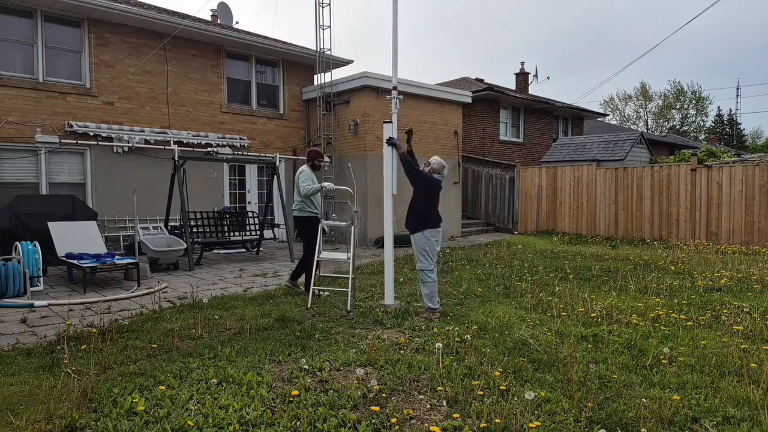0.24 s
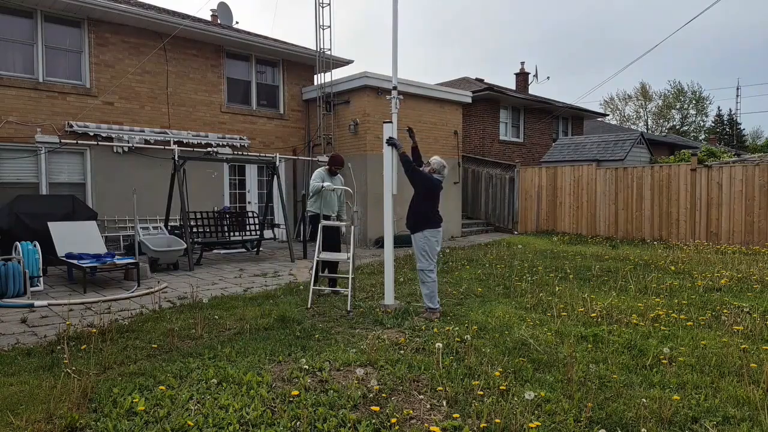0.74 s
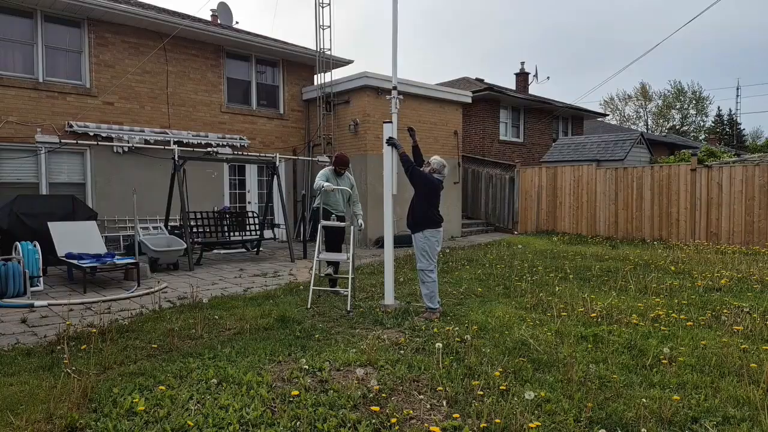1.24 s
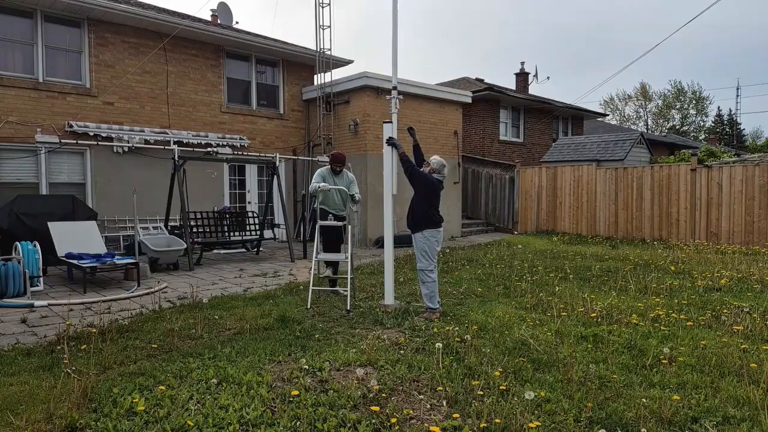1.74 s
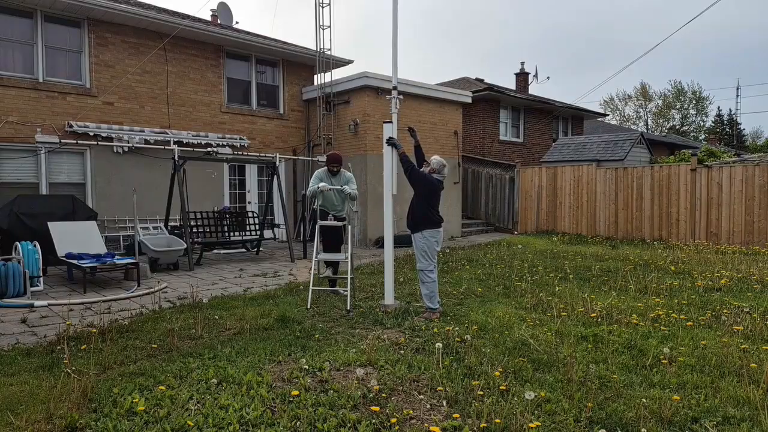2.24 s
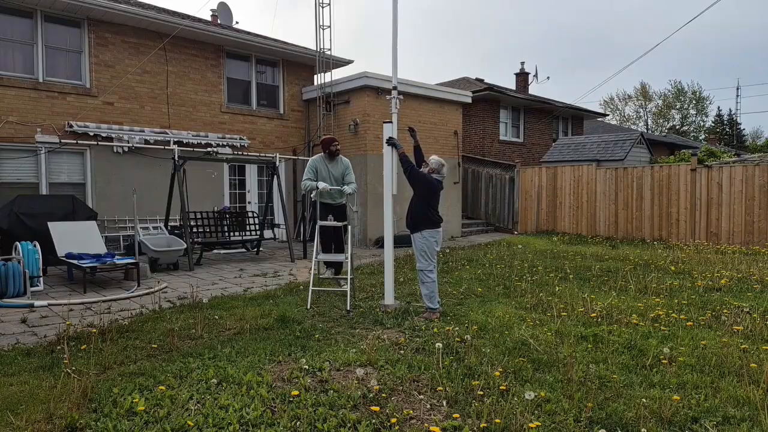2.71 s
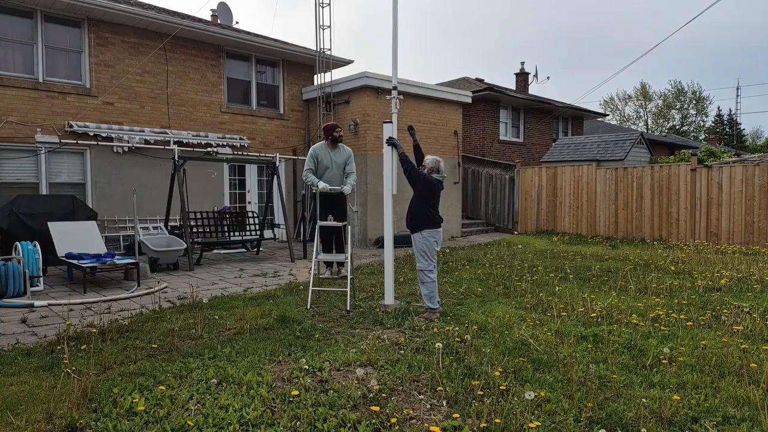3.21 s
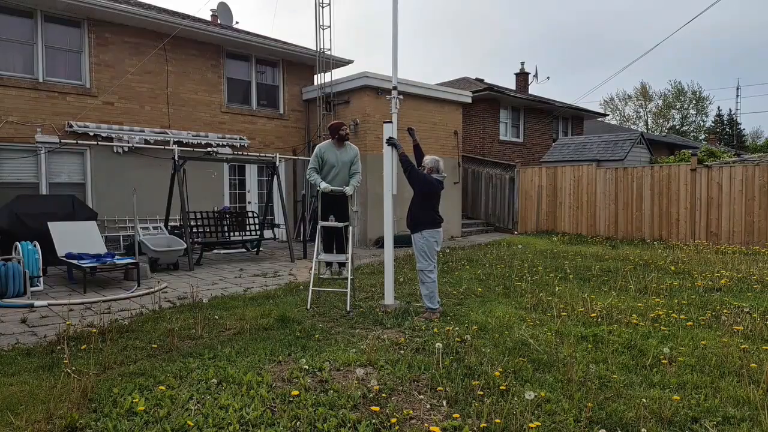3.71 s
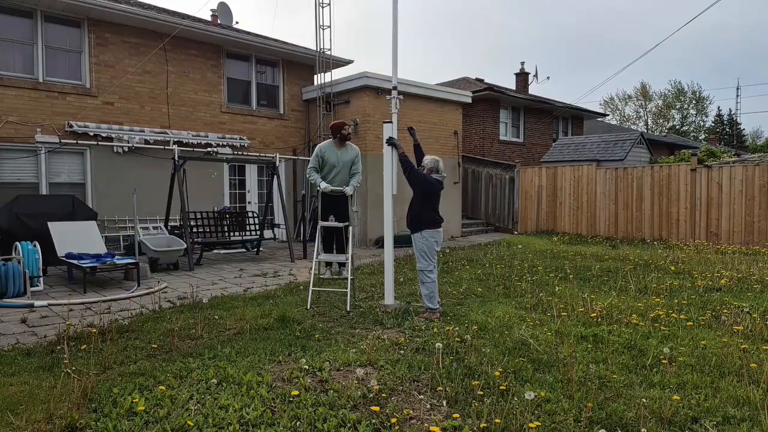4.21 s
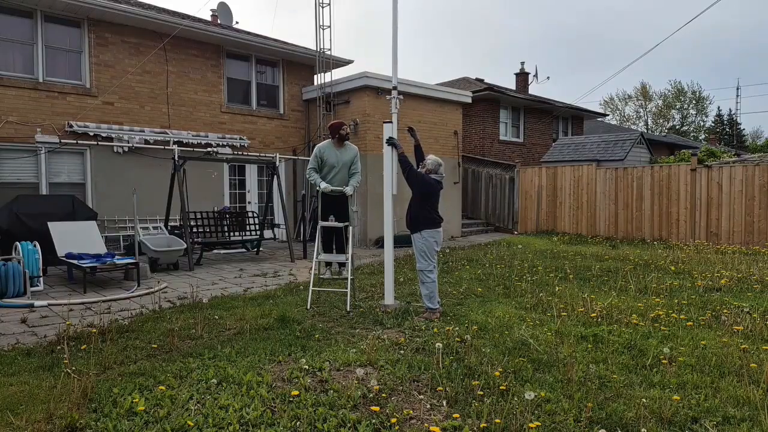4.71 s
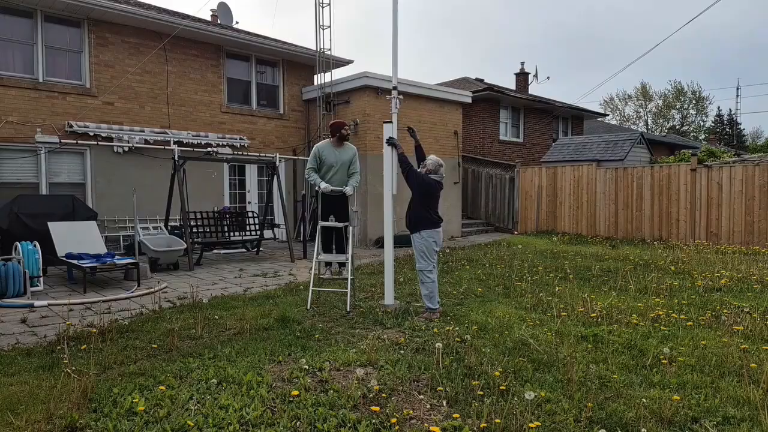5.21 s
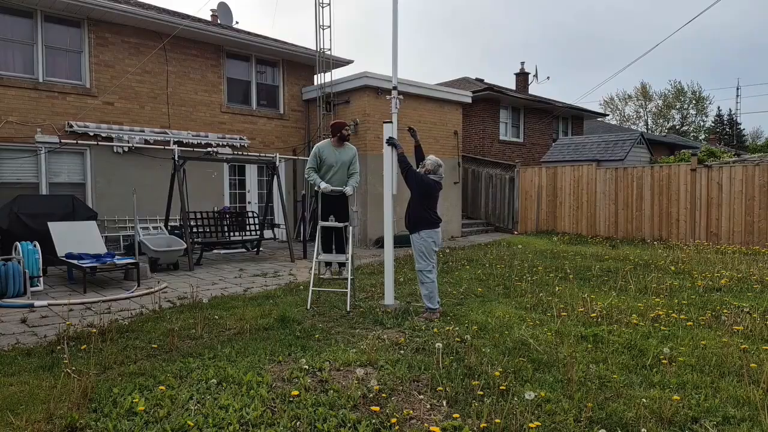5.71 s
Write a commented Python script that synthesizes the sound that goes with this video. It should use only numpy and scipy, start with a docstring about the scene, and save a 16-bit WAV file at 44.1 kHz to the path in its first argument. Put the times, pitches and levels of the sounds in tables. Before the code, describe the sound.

Birds chirp and whistle in a yard as metal pole sections clink and rattle, with dry hardware clicks and low traffic.

```python
"""Loose tube sections of a metal antenna mast knock, rattle and ring as two people work on it.
The place is a backyard, with echoes off brick walls and a fence. Small hardware and a stepladder
clack drily and thud, and at the start steps rustle faintly in the grass. Nearby one bird chirps and
another whistles; distant traffic rumbles underneath. Heard through a two-port stereo microphone."""
import sys
import numpy as np
from scipy import signal
from scipy.fft import rfft, irfft, next_fast_len
from scipy.io import wavfile
from scipy.ndimage import uniform_filter1d

SR = 44100
rng = np.random.default_rng(int(sys.argv[2]) if len(sys.argv) > 2 else 0)


def master_out(mix):
    """Clip the mix to full scale and print it as 16-bit PCM to the path in sys.argv[1]."""
    frames = np.transpose(np.atleast_2d(mix))
    ceiling = np.clip(frames, -1, 1)
    pcm = np.round(ceiling * 32767).astype(np.int16)
    wavfile.write(sys.argv[1], SR, pcm)


N = 262395
TIME = np.arange(N) / SR


def from_db(db):
    """Decibels to gain."""
    return 10 ** (np.asarray(db) / 20)


def rms_one(x):
    """Scale to unit power."""
    return x / np.sqrt(np.mean(x ** 2) + 1e-20)


def at_hz(points, hz):
    """Read a curve on a log-frequency axis."""
    freq_hz, value = np.transpose(points)
    return np.interp(np.log(hz + 1), np.log(freq_hz), value)


def noise(spectrum):
    """Unit-power noise, coloured by rows of freq_hz, density_db."""
    size = 2 ** 19
    gain = from_db(at_hz(spectrum, np.fft.rfftfreq(size, 1 / SR)))
    return rms_one(irfft(gain * rfft(rng.standard_normal(size)))[:N])


def wide_noise(spectrum):
    """Noise from all round the microphone: alike on both sides in the bass, hardly so in the treble."""
    # Likeness of left and right: freq_hz, correlation
    likeness = [(60, 0.92), (125, 0.92), (250, 0.89), (500, 0.5), (1000, 0.077), (4000, 0.11)]
    hz = np.geomspace(20, 16000, 200)
    alike, level_db = np.clip(at_hz(likeness, hz), 0, .99), at_hz(spectrum, hz)
    power = from_db(level_db) ** 2 * hz
    mid, side = [noise(np.c_[hz, level_db + 10 * np.log10(share)])
                 * np.sqrt(np.sum(power * share) / np.sum(power))
                 for share in ((1 + alike) / 2, (1 - alike) / 2)]
    return np.array([mid + side, mid - side])


def burst(start_s, rise_s, decay_s):
    """Burst envelope: swells quickly, peaks 4 ms after start_s, then dies away."""
    age = TIME - start_s - .004
    return np.exp(-np.minimum(np.maximum(-age / rise_s, age / decay_s), 40))


def chatter(rough_db, grain_s):
    """Uneven strength of tiny contacts, drawn anew for each grain."""
    knots = np.arange(0, N / SR, grain_s)
    strength = from_db(rough_db * np.clip(rng.standard_normal(len(knots)), -2, 2))
    return rms_one(np.interp(TIME, knots, strength))


def yard(x, early_db, echo_db, tail_db, t60_s):
    """Direct sound, scatter from nearby things, then wall echoes and a dying tail; power is kept."""
    # Echoes off the walls: delay_s, left_db, right_db
    echoes = [(.011, -9, -18.5), (0.02, -32, -28), (.047, -9, -10), (.058, -17.5, -10.5)]
    age = TIME[:SR]
    scatter = rng.standard_normal((2, SR)) * (1 - np.exp(-age / .001))
    early = from_db(early_db) * rms_one(scatter * np.exp(-age / .005))
    tail = from_db(tail_db) * rms_one(scatter * (1 - np.exp(-age / .008)) * from_db(-60 * age / t60_s))
    response = (early + tail) / np.sqrt(SR)
    response[:, 0] += 1
    for delay_s, left_db, right_db in echoes:
        arrival = int(delay_s * SR) + rng.integers(0, 20, size=2)
        response[[0, 1], arrival] += from_db(echo_db) * from_db([left_db, right_db])
    wet = signal.fftconvolve(x[None], response, axes=1)[:, :N]
    return wet * x.std() / wet.std(axis=1, keepdims=True)


def microphone(x, lag_s):
    """Two ports, coloured a little differently; the right one hears the sound lag_s later."""
    # Balance of the ports: freq_hz, left_minus_right_db
    balance = [(60, 2.5), (125, 0.6), (250, 0.8), (500, 1), (1000, .5), (2000, -0.5), (4500, 3.5),
               (8000, -1.5), (12500, 2)]
    size = next_fast_len(N + SR // 10, real=True)
    hz = np.fft.rfftfreq(size, 1 / SR)
    lean = from_db(at_hz(balance, hz) / 2)
    delay = np.exp(-2j * np.pi * hz * lag_s)
    return irfft(rfft(x, size) * np.array([lean, delay / lean]), size)[:, :N]


def engine_hum(firing_hz, wander, octave_db):
    """The firing tone of a far engine and its octave, wandering a little in pitch."""
    knots = np.arange(0, N / SR, .08)
    speed = 1 + wander * np.interp(TIME, knots, rng.standard_normal(len(knots)))
    phase = 2 * np.pi * firing_hz * np.cumsum(speed) / SR
    return rms_one(np.sin(phase) + from_db(octave_db) * np.sin(2 * phase))


def traffic(rumble_db, hum_db, road_db):
    """Far engines boom near 80 Hz under a dull wash of tyres that swells a little."""
    # Colours of the engine rumble and of tyres on the road: freq_hz, density_db
    rumble_spectrum = [(20, -31.5), (32, -31), (50, -10.5), (65, -3), (79, -0.5), (90, -3.5), (115, -8),
                       (150, -37), (400, -69.5)]
    road_spectrum = [(20, -13), (70, -7), (125, 7.5), (150, -2), (190, 0.5), (240, -4.5), (310, -11.5),
                     (430, -8), (650, -15), (1150, -18.5), (1550, -28.5), (2100, -42.5), (3300, -49),
                     (9000, -90), (14500, -58.5)]
    # Swell of the engines and of the tyres: time_s, level_db
    engine_levels = [(0.0, -29.5), (0.08, -32), (1.47, -34), (2.05, -29.5), (3.65, -35.5), (5.34, -32),
                     (5.95, -40.5)]
    tyre_levels = [(0.0, -47.5), (0.58, -47), (0.84, -47), (5.29, -46), (5.5, -43.5), (5.95, -46)]
    engines = from_db(np.interp(TIME, *np.transpose(engine_levels)))
    tyres = from_db(np.interp(TIME, *np.transpose(tyre_levels)))
    rumble = from_db(rumble_db) * wide_noise(rumble_spectrum)
    hum = from_db(hum_db) * engine_hum(firing_hz=80.63, wander=.025, octave_db=-20)
    return engines * (rumble + hum) + tyres * from_db(road_db) * wide_noise(road_spectrum)


def grass(level_db, until_s, fade_s):
    """A faint rustle while one person walks to the ladder."""
    # Grass underfoot: freq_hz, density_db
    rustle = [(1500, -25), (3000, -5), (6000, -7), (10000, -1), (13000, 3), (16000, 0)]
    walking = np.clip((until_s - TIME) / fade_s + 1, 0, 1)
    return from_db(level_db) * walking * wide_noise(rustle) * chatter(rough_db=5, grain_s=.021)


def sing(hz, gain, waver, rasp, overtone_db):
    """A bird's tone: fluttering in pitch, raspy in strength, with two faint overtones."""
    steps = np.arange(len(hz))
    flutter = np.interp(steps / 60, steps, rng.standard_normal(len(hz)))
    buzz = np.interp(steps / 36, steps, rng.standard_normal(len(hz)))
    phase = 2 * np.pi * np.cumsum(hz * (1 + waver * flutter)) / SR
    overtones = from_db(overtone_db) * (np.sin(2 * phase) + np.sin(3 * phase))
    return gain * (1 + rasp * buzz) * (np.sin(phase) + overtones)


def syllable(start_s, length_s, first_hz, mid_hz, last_hz, level_db, waver, rasp):
    """One bird note that arches through three pitches."""
    out = np.zeros(N)
    on = (TIME >= start_s) & (TIME < start_s + length_s)
    if on.any():
        progress = (TIME[on] - start_s) / length_s
        arch = np.abs(2 * progress - 1) ** 2.3   # flat in the middle, steep on the flanks
        hz = mid_hz - np.where(progress < .5, mid_hz - first_hz, mid_hz - last_hz) * arch
        envelope = np.interp(progress, [0, .08, .3, .5, .75, .93, 1], [0, .4, .9, .8, 1, .6, 0])
        out[on] = sing(hz, from_db(level_db) * envelope, waver, rasp, overtone_db=-31)
    return out


def whistling_bird(gain_db):
    """A slurred tune nearby, varied each time, clear on its crests, hoarse in its dips and at its close."""
    # One list per whistle (two crests, a deep dip, a closing rise): time_s, pitch_hz, level_db
    whistles = [
        [(2.74, 4300, -62), (2.785, 5000, -43), (2.82, 4600, -54), (2.86, 4500, -48), (2.895, 3700, -44),
         (2.92, 3000, -66), (2.95, 4200, -46), (2.97, 4800, -52)],
        [(3.458, 3850, -62), (3.494, 4200, -49), (3.501, 4780, -34), (3.523, 4830, -35), (3.538, 4250, -51),
         (3.59, 4450, -46), (3.636, 3350, -48), (3.652, 2850, -68), (3.69, 3100, -55), (3.716, 4700, -42)],
        [(4.07, 4350, -60), (4.1, 4200, -52), (4.143, 5020, -37), (4.175, 4600, -46), (4.21, 4620, -41),
         (4.25, 3450, -48), (4.275, 3000, -53), (4.3, 3450, -52), (4.326, 4800, -42)],
        [(5.035, 3350, -62), (5.076, 4620, -39), (5.095, 4350, -46), (5.12, 3830, -52), (5.145, 3950, -50),
         (5.172, 4300, -45), (5.208, 3350, -45), (5.24, 2800, -70), (5.272, 3100, -55), (5.298, 4600, -39)],
    ]
    # Low notes closing or between whistles: start_s, length_s, first_hz, mid_hz, last_hz, level_db
    low_notes = [(3.69, .04, 2850, 3100, 3050, -59), (3.712, .024, 3300, 3750, 3900, -49),
                 (3.828, .048, 3000, 2880, 2700, -64), (4.306, .028, 3300, 3750, 3900, -52),
                 (5.28, .028, 3200, 3650, 3800, -51)]
    out = from_db(gain_db) * sum(syllable(*note, waver=.03, rasp=.74) for note in low_notes)
    for whistle in whistles:
        time_s, pitch_hz, level_db = np.transpose(whistle)
        on = (TIME >= time_s[0]) & (TIME < time_s[-1])
        t = TIME[on]
        gain = from_db(gain_db + np.interp(t, time_s, level_db)) * signal.windows.tukey(len(t), .03)
        pitch = uniform_filter1d(np.interp(t, time_s, pitch_hz), size=300)
        closing = np.clip((t - time_s[-1]) / .05 + 1.5, 0, 1)
        hoarse = np.maximum(np.interp(pitch, [3400, 4300], [1, .22]), closing)
        out[on] += sing(pitch, gain, waver=.06 * hoarse, rasp=.9 * hoarse, overtone_db=-32)
    return out


def chirping_bird(gain_db):
    """A nearby bird repeats five arched syllables, varying their pace a little and their stress."""
    # Calls: start_s, stretch, opening_db, middle_db, closing_db
    calls = [(-.2, 1, -52, -52, -52), (.329, .95, -46, -40, -38), (1.617, .97, -47, -50, -35),
             (1.961, 1, -38, -33, -34.5)]
    # Syllables of one call: after_s, length_s, first_hz, mid_hz, last_hz, accent_db
    syllables = [(0, .019, 3700, 4750, 3600, -7), (.005, .034, 5000, 6800, 4200, -10),
                 (.072, .022, 3400, 5050, 3800, -1), (.141, .038, 4200, 6300, 3700, 0),
                 (.177, .046, 3800, 6600, 4900, -5)]
    out = np.zeros(N)
    for start_s, stretch, opening_db, middle_db, closing_db in calls:
        stresses = (opening_db, opening_db, middle_db, closing_db, closing_db)
        for stress_db, (after_s, length_s, *pitches_hz, accent_db) in zip(stresses, syllables):
            out += syllable(start_s + stretch * after_s, stretch * length_s, *pitches_hz,
                            stress_db + accent_db + gain_db, waver=.01, rasp=.66)
    return out


def thuds(rise_s, decay_s):
    """Weight shifts on the ladder and the mast: short, low bumps with no ring."""
    # Bumps: start_s, level_db
    bumps = [(1.657, -40.5), (2.311, -41), (3.021, -43), (4.05, -41), (4.243, -41.5), (4.626, -33),
             (4.68, -40), (4.873, -39), (4.985, -43), (5.389, -39.5), (5.605, -37), (5.844, -35.5)]
    # Their dull colour: freq_hz, density_db
    spectrum = [(60, -20), (120, -2), (170, 0), (230, -1), (320, -18), (700, -45), (3000, -100)]
    return noise(spectrum) * sum(from_db(db) * burst(start_s, rise_s, decay_s) for start_s, db in bumps)


def hardware(snap_gain_db, hollow_gain_db, rise_s):
    """Damped parts clack with hardly any ring; short bursts of hiss and faint touches come in between."""
    # Dry clacks, their quick repeats and short bursts of bright hiss: start_s, snap_db, hollow_db, decay_s
    clacks = [(.127, -72, -72, 0.0086), (.727, -44, -52.5, 0.0061), (1.333, -64, -43.5, 0.0087),
              (1.345, -39, -41, 0.012), (1.4, -52.5, -63, 0.033), (1.48, -61, -56, 0.031),
              (1.67, -41, -50, 0.015), (1.963, -50.5, -56, 0.038), (2.306, -32, -49.5, 0.0081),
              (3.022, -33.5, -44.5, 0.0096), (3.424, -59.5, -64.5, 0.082), (3.719, -51, -59.5, 0.0076),
              (4.239, -40.5, -55, 0.0085), (4.689, -35, -52, 0.011), (4.73, -43, -58, 0.022),
              (4.7646, -36, -49, .014), (4.82, -50, -58, .02), (4.855, -37, -50, .014),
              (5.168, -33, -45, 0.0081), (5.211, -42.5, -75, 0.0091)]
    # Their bright snap and hollow body: freq_hz, density_db
    snap_spectrum = [(1000, -16), (2700, -6), (4000, 0), (6500, 1), (8500, -1), (10200, 1), (11600, -3.5),
                     (14200, 0.5), (16000, -7)]
    hollow_spectrum = [(300, -14), (780, -9), (950, -1), (1150, -6), (1600, -6), (2000, 1.5), (2400, -1),
                       (2650, -7), (2950, -5), (3400, -11), (6000, -19), (16000, -35)]
    touches_per_s, touch_db, touch_decay_s = 4.5, -77.5, .015
    snap, hollow = noise(snap_spectrum), noise(hollow_spectrum)
    touches = rng.random(N) < touches_per_s / SR
    touch_envelope = signal.lfilter([1], [1, -np.exp(-1 / (touch_decay_s * SR))], touches + 1e-18)
    out = from_db(touch_db) * snap * touch_envelope
    for start_s, snap_db, hollow_db, decay_s in clacks:
        blend = from_db(snap_db + snap_gain_db) * snap + from_db(hollow_db + hollow_gain_db) * hollow
        out += burst(start_s, rise_s, decay_s) * blend
    return out * chatter(rough_db=4, grain_s=.0008)


def struck(modes, start_s, decay_s, lag_at_1khz_s=0):
    """A swelling, dying train of small rebounds pumps each mode; with a lag, lower modes arrive later."""
    age = TIME[:SR // 2]
    rebounds = rng.standard_normal(len(age)) * (rng.random(len(age)) < 1200 / SR)   # about 1200 a second
    force = rebounds * np.minimum(age / .004, 1) * np.exp(-age / decay_s)
    out = np.zeros(N + SR)
    for pitch_hz, level_db, t60_s in modes:
        onset = int((start_s - .002 + lag_at_1khz_s * 1000 / pitch_hz) * SR)
        detune_hz = rng.normal(0, 5)   # grip and contact point detune each blow a little
        radius = from_db(-60 / (t60_s * SR))
        angle = 2 * np.pi * (pitch_hz + detune_hz) / SR
        tone = signal.lfilter([0, 1], [1, -2 * radius * np.cos(angle), radius * radius], force)
        out[onset:onset + len(age)] += from_db(level_db + rng.normal(0, 2.6)) * tone / np.abs(tone).max()
    return out[:N]


def mast(ring_gain_db, clank_gain_db, scrape_gain_db, edge_gain_db, rise_s):
    """Tube sections knock together: a high wall ring, a lower clank, shrill overtones and contact noise."""
    # Tube knocks: start_s, ring_db, clank_db, sharpness_db, rattle_decay_s
    knocks = [(0.692, -58.5, -60, -93, 0.014), (1.018, -59, -58.5, -95, 0.017),
              (1.5802, -47, -54, -70, 0.054), (1.693, -42, -54, -68, 0.011), (1.876, -60, -48, -78, 0.022),
              (2.171, -45, -44, -61.5, 0.016), (2.272, -52.5, -54.5, -82, 0.0085),
              (2.633, -59.5, -60.5, -89, 0.014), (2.664, -41, -44.5, -58, 0.057),
              (2.704, -41, -39.5, -62, 0.026), (2.849, -21.5, -43, -34, 0.011),
              (2.857, -23, -39, -39, 0.013), (3.039, -29, -37, -45, 0.02),
              (3.054, -38.5, -34.5, -57, 0.0096), (3.074, -48.5, -38.5, -62, 0.0065),
              (3.102, -39, -49, -61.5, 0.0083), (3.3637, -73, -47.5, -84, 0.0088),
              (5.413, -50.5, -47, -75.5, 0.032), (5.441, -42.5, -48, -66, .039),
              (5.521, -40, -43.5, -71.5, 0.021), (5.536, -35.5, -36.5, -57, 0.015),
              (5.706, -62.5, -48, -85, 0.016), (5.746, -60.5, -60.5, -88, .01),
              (5.8435, -27.5, -42, -62.5, 0.014), (5.864, -26.5, -38.5, -54.5, 0.01),
              (5.882, -31.5, -37.5, -39, 0.015), (5.926, -36, -48, -58, 0.0097)]
    # Tube wall modes, whose close neighbours beat: pitch_hz, level_db, t60_s
    ring_modes = [(2480, -31, .08), (3350, -24, .08), (3470, -26, .08), (3545, -24, .08), (3980, -26, .05),
                  (4180, -25, .05), (4340, -21, .05), (4425, -13, .05), (4505, -8, .05), (4542, -1.5, .055),
                  (4560, -10, .1), (4645, -12, .05), (5010, -27, .08), (5175, -30, .08)]
    # Tube bending modes: pitch_hz, level_db, t60_s
    clank_modes = [(430, -5, .25), (760, 1, .14), (815, -1, .1), (889, 4.5, .15), (962, 4, .12),
                   (1037, 3.5, .15), (1146, -2, .11), (1225, -7, .12), (1358, -6, .17), (1660, -12, .06),
                   (1834, 3, .11), (2080, -10, .06)]
    # Highest modes, woken most by sharp contacts: pitch_hz, level_db, t60_s
    shrill_modes = [(6380, -9, .07), (7040, -10, .15), (8450, -7, .06), (10100, -15, .12), (10480, -15, .1),
                    (12400, -3, .15), (12470, -5, .13), (12700, -10, .08)]
    # Dull and sharp parts of the contact noise: freq_hz, density_db
    scrape_spectrum = [(100, -8.5), (220, 3), (330, -8), (560, -7.5), (850, 4), (1200, 2), (2000, -4.5),
                       (2900, -14), (3400, -6.5), (4100, -14.5), (5000, -11), (6000, -32), (16000, -35)]
    edge_spectrum = [(1000, -7.5), (3000, 4), (4500, 3), (6000, 7.5), (8500, 8), (10500, 1), (11500, -1.5),
                     (12500, 9.5), (15500, 0)]
    scrape, edge = noise(scrape_spectrum), noise(edge_spectrum)
    tones, contact = np.zeros(N), np.zeros(N)
    for start_s, ring_db, clank_db, sharpness_db, decay_s in knocks:
        body_db = clank_db + .5 * min(clank_db + 42, 0)   # light touches hardly bend the tube
        shrill_db = -52 + .72 * (sharpness_db + 55)
        ring = struck(ring_modes, start_s, decay_s)
        clank = struck(clank_modes, start_s, decay_s, lag_at_1khz_s=.014)   # low bending waves are slower
        tones += from_db(ring_db + ring_gain_db) * ring + from_db(body_db + clank_gain_db) * clank
        tones += from_db(shrill_db) * struck(shrill_modes, start_s, decay_s)
        grit = from_db(body_db + scrape_gain_db) * scrape + from_db(sharpness_db + edge_gain_db) * edge
        contact += burst(start_s, rise_s, decay_s) * grit
    return tones + contact * chatter(rough_db=9, grain_s=.0012)


def scene():
    """Mast, hardware and birds echo in the yard and reach the left port first; the rest has no echo."""
    tubes = mast(ring_gain_db=1.5, clank_gain_db=-3.5, scrape_gain_db=-1.5, edge_gain_db=1.5, rise_s=.0089)
    nearby = yard(tubes, early_db=0, echo_db=-2, tail_db=-5, t60_s=.66)
    clacks = hardware(snap_gain_db=1, hollow_gain_db=4, rise_s=.0052)
    nearby += yard(clacks, early_db=5, echo_db=3.5, tail_db=4, t60_s=.57)
    nearby += yard(chirping_bird(gain_db=2), early_db=-3, echo_db=-5, tail_db=-2, t60_s=.4)
    nearby += yard(whistling_bird(gain_db=-1), early_db=1, echo_db=-10, tail_db=-2.5, t60_s=.4)
    background = grass(level_db=-68.5, until_s=.75, fade_s=.2) + thuds(rise_s=.004, decay_s=.018)
    background += traffic(rumble_db=-.5, hum_db=-4, road_db=5.5)
    return microphone(nearby, lag_s=.00002) + microphone(background, lag_s=0)


def record(dry):
    """The treble is cut steeply above 15.9 kHz."""
    return signal.sosfilt(signal.ellip(12, .1, 90, 15900, fs=SR, output="sos"), dry)


dry = scene()
out = record(dry)
master_out(out)
```